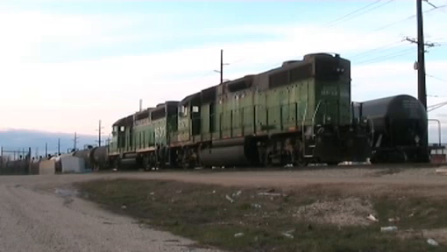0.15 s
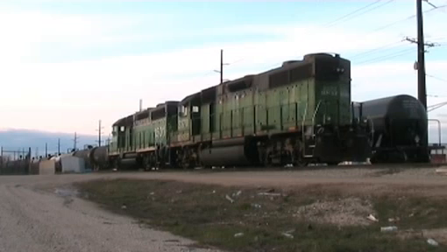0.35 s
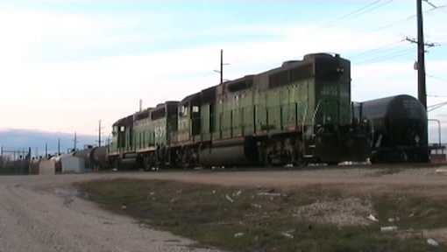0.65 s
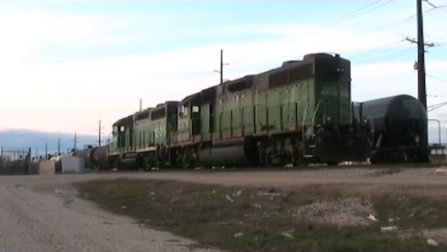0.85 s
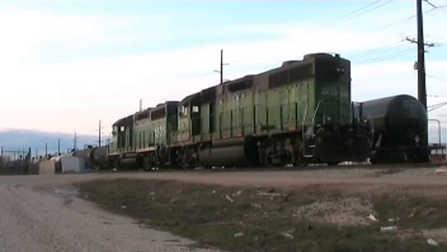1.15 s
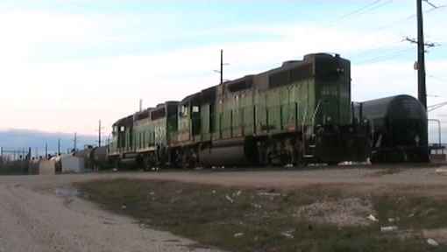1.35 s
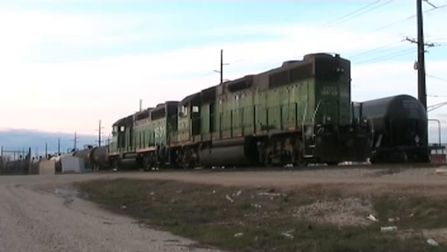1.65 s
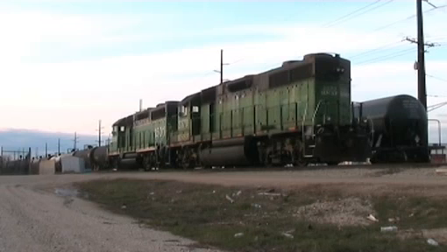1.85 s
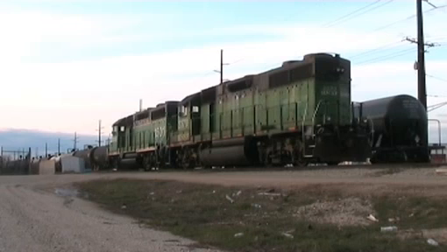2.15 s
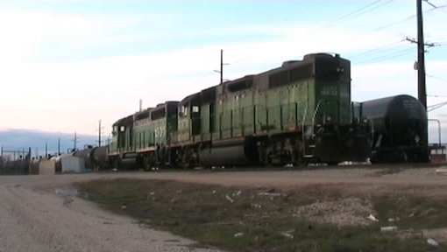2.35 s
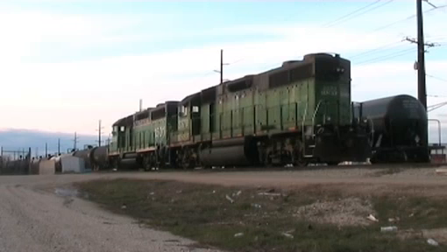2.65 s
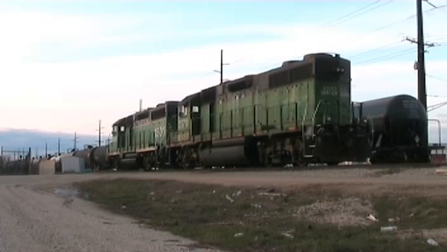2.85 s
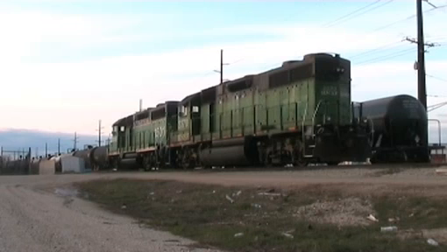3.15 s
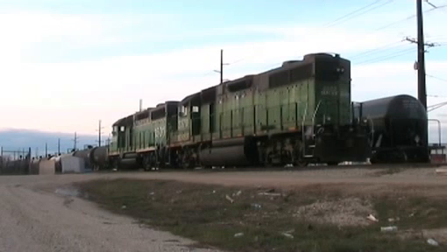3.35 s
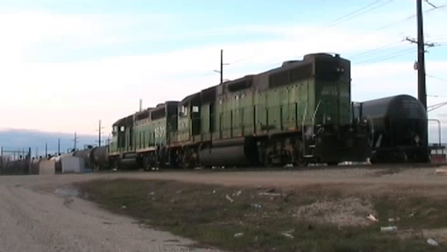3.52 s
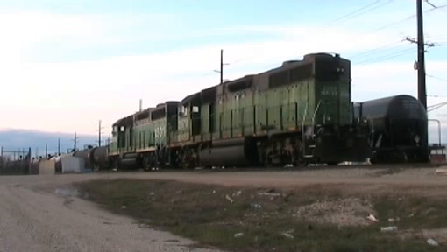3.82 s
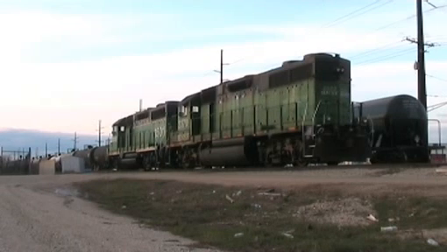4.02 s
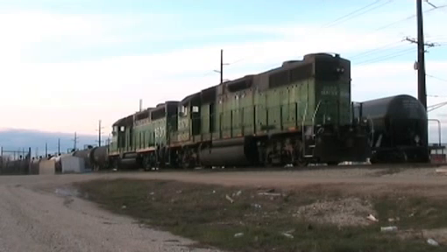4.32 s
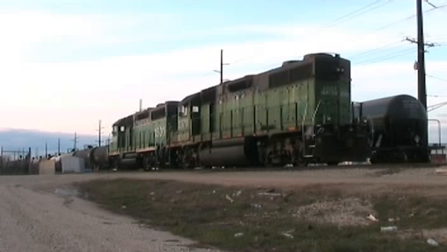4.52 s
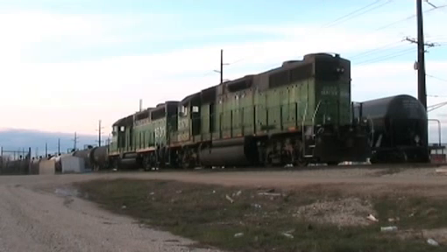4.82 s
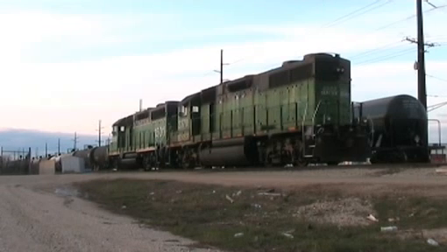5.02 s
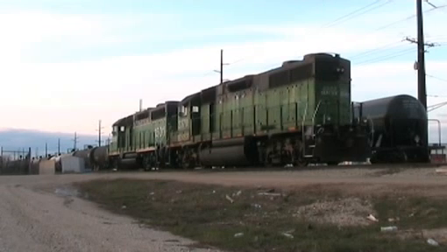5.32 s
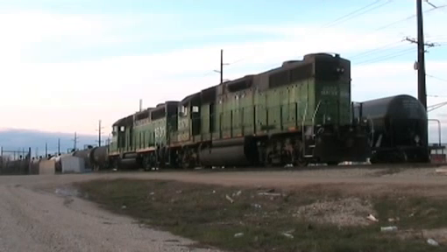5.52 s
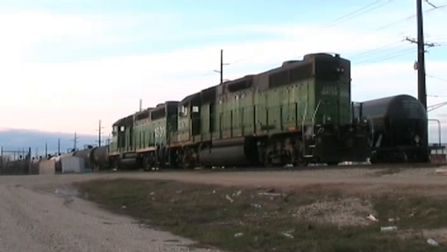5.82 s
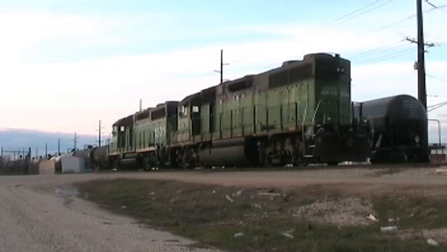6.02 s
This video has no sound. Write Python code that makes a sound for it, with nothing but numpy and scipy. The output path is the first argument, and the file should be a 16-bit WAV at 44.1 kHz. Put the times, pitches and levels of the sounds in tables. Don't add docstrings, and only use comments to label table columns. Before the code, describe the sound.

Two big diesel locomotives idle steadily in an open rail yard, low throbbing drone with faint gear whine, light wind bumps and one brief air hiss.

```python
import sys
import numpy as np
from scipy import signal
from scipy.fft import rfft, irfft, next_fast_len
from scipy.io import wavfile
from scipy.ndimage import uniform_filter1d, map_coordinates

SR = 44100
rng = np.random.default_rng(int(sys.argv[2]) if len(sys.argv) > 2 else 0)


def store_pcm(level_fs):
    pcm = np.round(np.clip(level_fs, -1, 1) * 32767).astype(np.int16)
    wavfile.write(sys.argv[1], SR, np.atleast_2d(pcm).T)


def attenuation_scalar(level_db):
    decades = np.asarray(level_db, float) / 20
    return 10 ** decades


N = 272097

NEAR_SHAFT, FAR_SHAFT = 5.3025, 5.2789

# time in seconds, exhaust level in dB.
LOAD = [(0, -24), (.6, -21.5), (1, -23), (1.7, -23), (2, -25), (2.4, -22), (2.9, -23.5), (3.4, -23.5),
        (4.3, -22.5), (4.9, -21.5), (5.4, -21.5), (5.8, -21.5), (6.17, -19)]
# time in seconds, gain in dB.
AIR_PATH = [(0, 0), (.55, -0.1), (.75, .5), (1.35, 1), (1.7, 0.9), (2, -0.6), (2.4, 0.3), (2.95, 0.5),
            (3.6, -0.35), (4.4, 0), (5, -0.5), (5.8, 0.5), (6.17, -1)]


def unit(x):
    return x / np.sqrt(np.mean(x ** 2) + 1e-20)


def along(points, hz):
    f, v = np.transpose(points)
    return np.interp(np.log(hz + 1), np.log(f + 1), v)


def curves(rows):
    s, *columns = np.transpose(rows)
    t = np.arange(N) / SR
    return [np.interp(t, s, column) for column in columns]


def wobble(rate):
    knots = rng.standard_normal(int(N * rate / SR) + 4)
    return map_coordinates(knots, [np.arange(N) * rate / SR])


def swells(rows):
    t = np.arange(N) / SR
    return sum(height * np.exp(-((t - s) / half) ** 2) for s, half, height in rows)


def filtered(x, response):
    m = next_fast_len(N + 8192)
    return irfft(rfft(x, m) * response(np.fft.rfftfreq(m, 1 / SR)), m)[..., :N]


def rush(spectrum, patchy_db):
    # frequency in Hz, left-right coherence.
    alike = [(60, 1), (260, 1), (1100, 0.97), (2300, 0.89), (4700, 0.62), (9000, 0.43)]
    z = signal.stft(rng.standard_normal((2, N)), nperseg=512)[2]
    field = uniform_filter1d(rng.standard_normal(z.shape[1:]), 6, 0)
    field = uniform_filter1d(field, 14, 1)
    pair = signal.istft(z * attenuation_scalar(patchy_db * unit(field)), nperseg=512)[1][:, :N]

    def mid_side(hz):
        turn = np.arccos(np.clip(along(alike, hz), -1, 1)) / 2
        return attenuation_scalar(along(spectrum, hz)) * [np.cos(turn), np.sin(turn)]

    mid, side = filtered(pair, mid_side)
    return unit(np.array([mid + side, mid - side]))


def effort():
    exhaust_db, = curves(LOAD)
    return exhaust_db - exhaust_db.mean()


def throb():
    return np.cos(2 * np.pi * NEAR_SHAFT * np.arange(N) / SR + 0.37)


def stroke():
    # time in seconds, half length in seconds, share lost.
    falter = [
        (5.17, 0.02, 0.34),
    ]
    return 1 - swells(falter)


def stack_band(hz):
    return np.exp(-((hz - 174) / 16) ** 6)


def engine(shaft, strong, rest, loudest, smear, drift, loose, count=600, size=16384):
    order = np.arange(count)
    draw = rng.standard_normal((4, count)) + 1j * rng.standard_normal((4, count))
    level = attenuation_scalar(along(rest, order * shaft)) * np.abs(draw[0]) / np.sqrt(2)
    level[[int(k) for k, _ in strong]] = attenuation_scalar([db for _, db in strong])
    in_manifold = np.abs(order * shaft - 278) < 22
    smear = smear * np.where(in_manifold, loose, 1)
    steps = smear * np.log2(2 + order / 30) * rng.standard_normal(count)
    phase = np.cumsum(steps) - 2 * np.pi * loudest * order
    base = level * np.exp(1j * phase) * size / np.sqrt(2)
    patterns = irfft(np.vstack([base, drift * base * draw[1:]]), size)
    turns = shaft * np.arange(N) / SR + 0.00049 * wobble(1.49)
    angle = turns % 1 * size
    weights = [1, wobble(0.64), wobble(1.29), wobble(3.504)]
    return sum(w * np.interp(angle, np.arange(size), p, period=size) for w, p in zip(weights, patterns))


def near_engine():
    # multiple of the shaft rate, level in dB rms.
    strong = [(8, -38), (9, -46), (32, -27.3), (33, -35.8), (35, -35.9), (48, -35.0), (49, -37.6),
              (50, -38.5), (52, -38.8), (53, -40.2), (56, -34.3), (59, -42.9), (62, -42.5), (65, -43.1),
              (79, -43.6), (81, -44.0), (86, -43.0), (87, -43.3), (89, -41.5), (90, -39.4), (91, -41.8),
              (95, -42.9), (96, -43.7), (97, -44.1), (98, -44.5), (99, -38.0), (100, -43.4), (103, -44.9),
              (113, -39.9), (158, -45.9), (257, -48.3), (316, -44.4)]
    # frequency in Hz, level in dB rms.
    rest = [(25, -88), (34, -65.5), (45, -55), (62, -64), (81, -44), (190, -52), (280, -53.5), (520, -50.5),
            (700, -50.5), (900, -68), (1150, -57.5), (1750, -58), (2000, -67), (3200, -77.5)]
    return engine(NEAR_SHAFT, strong, rest, loudest=.66, smear=0.8364, drift=0.21, loose=.15)


def far_engine():
    # multiple of the shaft rate, level in dB rms.
    strong = [(8, -44), (32, -37.2), (40, -39.6), (45, -45.9), (46, -43.9), (48, -39.2), (49, -40.2),
              (63, -45.8), (64, -42.4), (71, -48.5), (72, -48.7), (73, -43.6), (74, -47.4), (76, -45.4),
              (84, -42.6), (85, -47.1), (86, -47.0), (87, -41.5), (97, -47.5), (98, -42.5), (119, -51.0)]
    # frequency in Hz, level in dB rms.
    rest = [(25, -77), (81, -69.5), (190, -69), (300, -45.5), (520, -63), (900, -57), (1400, -57),
            (2000, -74)]
    return engine(FAR_SHAFT, strong, rest, loudest=.55, smear=0.901, drift=0.23, loose=0.99)


def beating(order, partners):
    t = np.arange(N) / SR
    turn = 2 * np.pi * order * NEAR_SHAFT * t + .12 * wobble(0.88)
    tones = [attenuation_scalar(db + 0.31 * wobble(2.7)) * np.sin(turn + 2 * np.pi * hz * (t - s)) for hz, db, s in partners]
    return np.sqrt(2) * sum(tones)


def firing_note():
    # offset from the 8th in Hz, level in dB rms, time in seconds when its crest meets the 8th's.
    firing = [(0, -42.5, 0), (-0.3, -43, 2.5), (5, -45.5, .003)]
    return beating(order=8, partners=firing)


def stack_note():
    # offset from the 32nd in Hz, level in dB rms, time in seconds when its crest meets the 32nd's.
    stack = [(0, -27, 0), (5.303, -35.4, .136), (-5.303, -41.8, .178), (15.908, -35.9, .028),
             (-.733, -36.9, .597), (4.54, -47.8, .186), (3.667, -41.8, .134), (8.963, -41.2, .016),
             (-1.655, -47.3, .121)]
    return beating(order=32, partners=stack) * attenuation_scalar(0.67 + 0.6 * effort())


def chug(near):
    def bands(hz):
        return [np.exp(-((hz - 276) / 18) ** 4), np.exp(-((hz - 297) / 3) ** 4)]

    manifold, order = filtered(near, bands)
    plain = attenuation_scalar(.8 * effort())
    thump = manifold * (attenuation_scalar(0.36 + 1.4 * effort() + .8 * wobble(3.7)) - plain)
    pipe = unit(order) * attenuation_scalar(-33 + 2.8 * effort())
    return thump + pipe - order * plain


def engine_tones():
    path_db, = curves(AIR_PATH)
    near = near_engine()

    def body_and_top(hz):
        low = 1 / (1 + (hz / 850) ** 8)
        deep = np.exp(-((hz - 44) / 9) ** 4)
        return [(1 - stack_band(hz) - deep) * low, 1 - low]

    body, top = filtered(near + far_engine(), body_and_top)
    pulses = (body * attenuation_scalar(0.64 * effort()) + chug(near)) * stroke()
    return firing_note() + stack_note() + pulses + top * attenuation_scalar(.8 * path_db)


def exhaust_roar():
    # frequency in Hz, density in dB per Hz.
    roar_spectrum = [(20, -40), (32, -30.5), (40, -7), (62, -7), (80, -7.5), (130, -1), (190, 2), (280, 3),
                     (390, -1), (520, -4), (700, -7), (900, -12), (1300, -37), (2000, -120)]
    exhaust_db, = curves(LOAD)
    roar = filtered(rush(roar_spectrum, patchy_db=0.94), lambda hz: 1 - .55 * stack_band(hz))
    return stroke() * attenuation_scalar(exhaust_db - 2.5 + 0.3 * throb()) * roar


def casing_noise():
    # frequency in Hz, density in dB per Hz.
    casing = [(500, -120), (800, -24), (1000, -8), (1250, 5), (1400, -1.5), (1580, -9.5), (1690, 6),
              (1800, -1.5), (2050, -2), (2300, -11.5), (3000, -23.5), (4000, -120)]
    path_db, = curves(AIR_PATH)
    return attenuation_scalar(-30.5 + path_db - 2.5 + 0.37 * throb()) * rush(casing, patchy_db=1.5)


def fan_air():
    # frequency in Hz, density in dB per Hz.
    air = [(1200, -120), (1900, -5.5), (2300, -2), (2770, 0.5), (3960, -6), (5300, -8.5), (5930, -10.5),
           (8570, -15.5), (9500, -20.5), (11500, -14.5), (12500, -120)]
    path_db, = curves(AIR_PATH)
    return attenuation_scalar(-39 + 1.2 * path_db + 1.0 + 0.14 * wobble(7.8)) * rush(air, patchy_db=0.75)


def gears():
    # multiple of the mesh rate, level in dB.
    near_12th = [(11, -4), (15, -16), (16, -14), (17, -17)]
    # multiple of the mesh rate, level in dB.
    near_19th = [(18, -12), (19, 0), (20, -11), (21, -11), (22, -9)]
    # frequency in Hz, level in dB rms.
    bearings = [(1444.7, -50), (2094, -57), (2439, -61), (5240, -70), (5251, -68), (5401, -65), (5455, -69),
                (8457, -77), (11150, -84)]
    # time in seconds, half length in seconds, gain of the 12th in dB, of the 19th in dB.
    glints = np.array([(.2, .18, 2, 11), (.48, .1, 8.5, 2), (.7, .05, 6, 1), (1.2, 0.27, 9.5, -1.5),
                       (2.93, 0.14, 6, 11), (4.45, .05, 5, 4), (4.68, .09, 9, 2), (4.89, 0.064, 10, 5),
                       (5.16, 0.21, 9.5, 11), (5.82, .17, 9.5, 8)])
    glint_db = swells(glints[:, :3])
    tip_db = swells(glints[:, [0, 1, 3]])
    t = np.arange(N) / SR
    mesh_hz = 460.72 + .2 * wobble(3)
    turn = 2 * np.pi * np.cumsum(mesh_hz) / SR

    def comb(rows):
        return sum(attenuation_scalar(db + 2.2 * wobble(11)) * np.sin(round(k) * turn + 0.53 * wobble(7)) for k, db in rows)

    mesh = attenuation_scalar(-35.5 + 1.5 * effort() + 0.14 * glint_db + 2.1 * wobble(7)) * np.sin(turn)
    top = attenuation_scalar(-59 + .2 * glint_db) * comb(near_12th)
    whine = attenuation_scalar(-62.5 + glint_db + 3.8 + 1.1 * wobble(12)) * np.sin(12 * turn)
    tip = attenuation_scalar(-64.5 + tip_db) * comb(near_19th)
    loose = sum(attenuation_scalar(db + 2.3 * wobble(2.6)) * np.sin(2 * np.pi * hz * t + 0.82 * wobble(2.7))
                for hz, db in bearings)
    return np.sqrt(2) * (mesh + top + whine + tip + loose)


def wind():
    # time in seconds, half length in seconds, level in dB.
    puffs = [
        (0.633, 0.048, -32),
        (.765, 0.014, -14),
        (1.968, .07, -37),
        (2.356, .04, -32),
        (2.5, .045, -31),
        (2.712, .04, -28),
        (3.6, 0.036, -40),
        (5.15, 0.023, -27.5),
    ]
    # frequency in Hz, density in dB per Hz.
    gust = [(15, -120), (30, -12.5), (60, -0.5), (110, 6.5), (200, -15.5), (400, -21), (900, -120)]
    pressure = unit(filtered(rng.standard_normal(N), lambda hz: attenuation_scalar(along(gust, hz))))
    breeze = attenuation_scalar(-44.5 + 2.7 * wobble(5.2))
    strength = breeze + swells([(s, half, attenuation_scalar(db)) for s, half, db in puffs])
    return strength * pressure * np.array([[1.2], [-.8]])


def vent():
    # start in seconds, hold in seconds, level in dB.
    blow_off = [
        (2.68, 0.018, -41),
        (2.797, .19, -40.5),
    ]
    # frequency in Hz, density in dB per Hz.
    jet = [(1500, -120), (2500, -6.5), (4500, 0), (6000, -5.5), (7500, -8), (9000, -19), (10500, -120)]
    opens, shuts = 61.5, 51.5
    t = np.arange(N) / SR
    tick = attenuation_scalar(-30 - 60 * np.abs(t - 2.678) / .012) * (t > 2.678)
    blasts = []
    for s, hold, db in blow_off:
        rise = opens * np.clip(s - t, 0, None)
        fall = shuts * np.clip(t - s - hold, 0, None)
        blasts.append(db - rise - fall)
    return (attenuation_scalar(np.max(blasts, axis=0)) + tick) * rush(jet, patchy_db=-0.5)


def guard():
    # trip time in seconds, clamp in dB.
    trips = np.array([
        (.78, 9),
        (2.76, 11),
        (5.23, 0),
    ])
    open_db, let_go_s, hold_s, bite_s = 5, 1.27, .74, .16
    after = np.arange(N) / SR - trips[:, :1]
    release = np.exp(-np.abs(after) / let_go_s)
    hold = 0.52 * (after < hold_s)
    bite = 0.83 * np.exp(-(2 * (after - bite_s) / bite_s) ** 2)
    clamp = trips[:, 1:] * (release + hold + bite) * (after > 0)
    return uniform_filter1d(open_db - clamp.sum(axis=0), size=SR // 50)


def sparse(x, drops):
    hz, t, z = signal.stft(x, SR, nperseg=1024)
    luck = rng.standard_normal((len(hz) // 2 + 1, len(t)))
    luck = unit(uniform_filter1d(luck, size=11, axis=1))
    band = hz[::2, None]
    busy = 1.4 * np.exp(-((t - 2.8) / .28) ** 2) * np.clip((band - 5500) / 2200, 0, 1.3)
    kept = luck > along(drops, hz[::2])[:, None] + busy
    return signal.istft(z * np.repeat(kept, 2, axis=0)[:len(hz)], SR, nperseg=1024)[1][:N]


def scene():
    # frequency in Hz, left minus right in dB.
    lean = [(60, 0.5), (170, 1.0), (460, 0.0), (1270, -1), (3530, 0), (9760, 0)]

    def ports(hz):
        lag = np.pi * hz * 30e-6 * (1 + (hz / 10500) ** 4) + 0.12 / (1 + (hz / 900) ** 2)
        return attenuation_scalar(along(lean, hz) / 2 * [[1], [-1]]) * np.exp(1j * lag * [[-1], [1]])

    engines = engine_tones() + exhaust_roar() + casing_noise() + fan_air()
    return filtered(engines + gears() + vent(), ports) + wind()


def roll_off(x):
    return signal.sosfilt(signal.butter(12, 11350, fs=SR, output="sos"), x)


def record(dry):
    # frequency in Hz, threshold in standard deviations.
    sum_drops = [(4500, -4), (6000, -2), (7500, -1.3), (8400, -.6), (8760, -2.6), (8880, .5), (9080, 1.3),
                 (9250, .5), (9450, 1.9), (9650, .9), (9900, 2.6), (10050, 2.6), (10140, .4), (10400, 4)]
    # frequency in Hz, threshold in standard deviations.
    side_drops = [(4500, -4), (6000, -1.8), (7500, -1.2), (9200, -.6), (9480, .5), (9700, -1), (10250, -.8),
                  (10450, 1.3), (11080, 3), (11150, -.9), (11230, 2.5)]
    mid, side = (dry[0] + dry[1]) / 2, (dry[0] - dry[1]) / 2
    bass = filtered(side, lambda hz: 1 / (1 + (hz / 650) ** 2))
    side = sparse(side + bass * (attenuation_scalar(guard()) - 1), side_drops)
    mid = filtered(mid, lambda hz: 1 / (1 + (29 / (hz + 1)) ** 8))
    mid = sparse(mid, sum_drops)
    return roll_off(np.array([mid + side, mid - side]) + .0076)


dry = scene()
out = record(dry)
store_pcm(out)
```